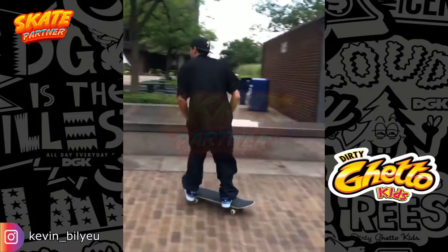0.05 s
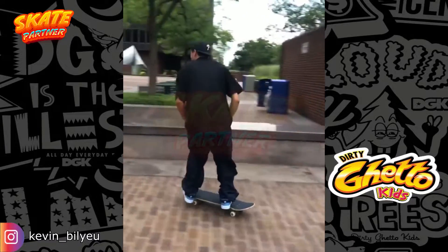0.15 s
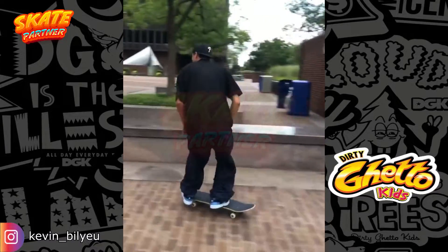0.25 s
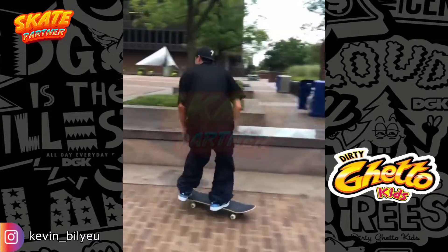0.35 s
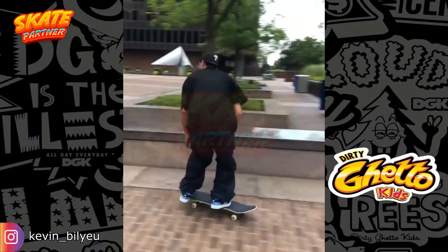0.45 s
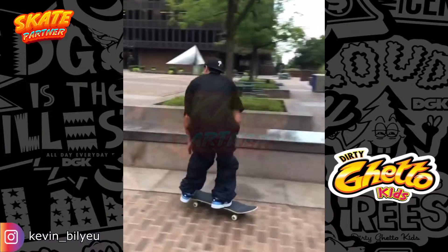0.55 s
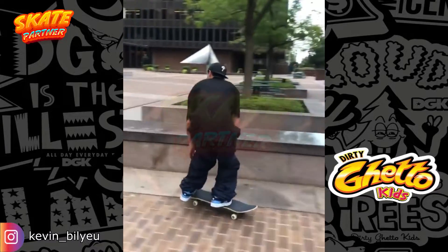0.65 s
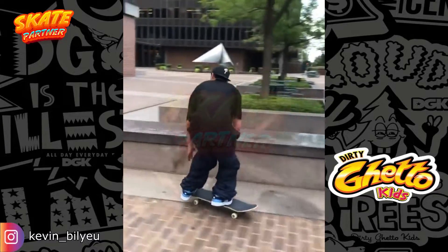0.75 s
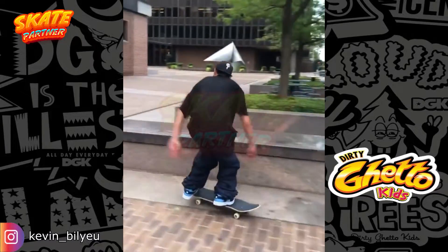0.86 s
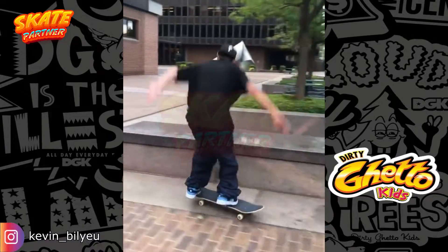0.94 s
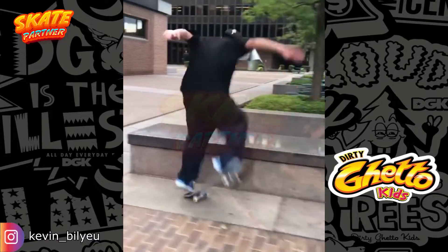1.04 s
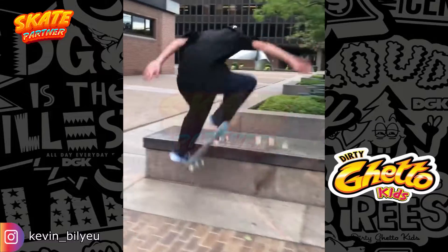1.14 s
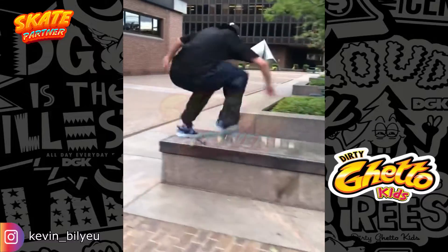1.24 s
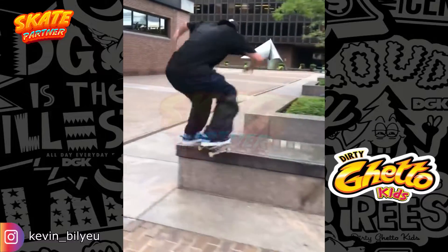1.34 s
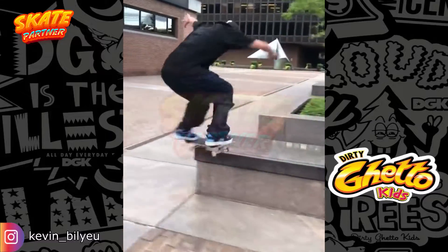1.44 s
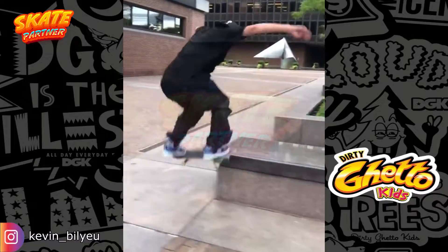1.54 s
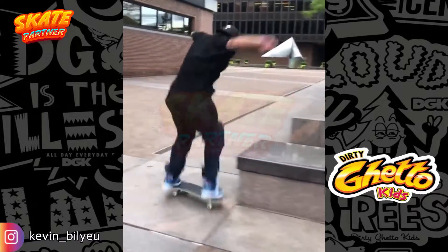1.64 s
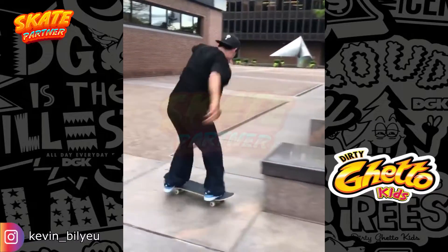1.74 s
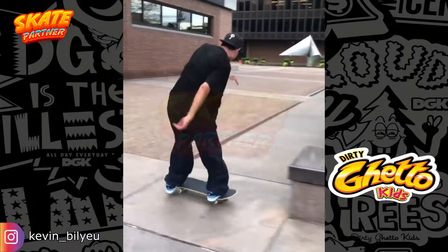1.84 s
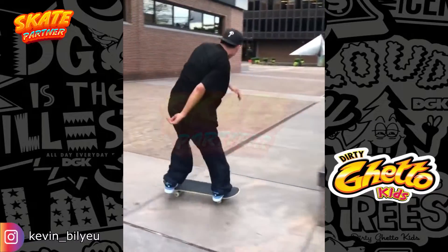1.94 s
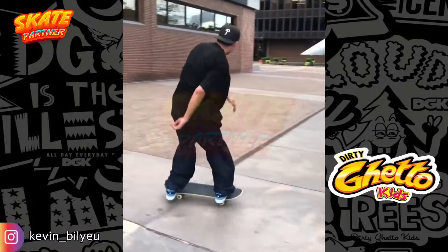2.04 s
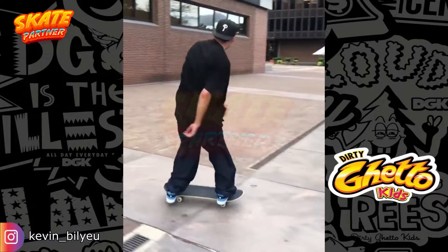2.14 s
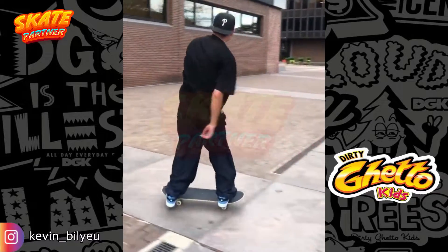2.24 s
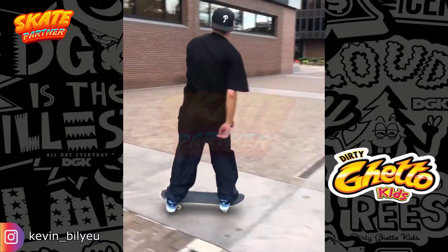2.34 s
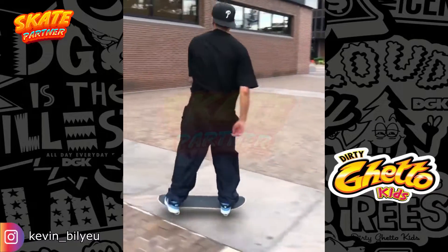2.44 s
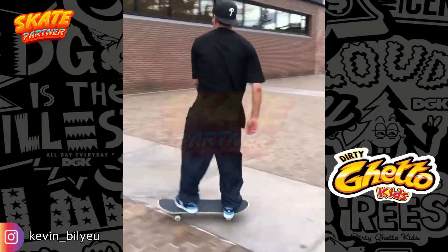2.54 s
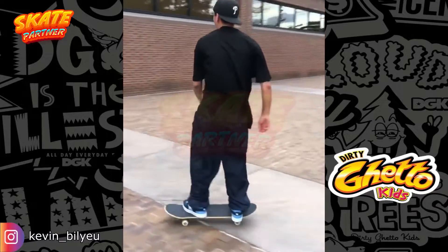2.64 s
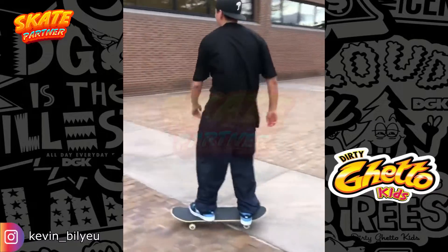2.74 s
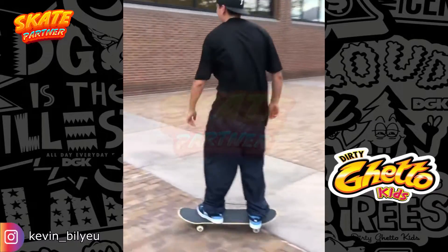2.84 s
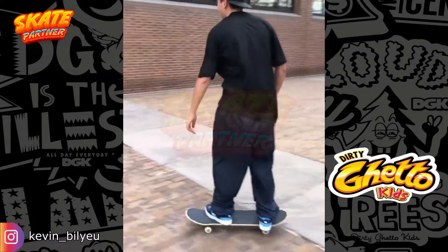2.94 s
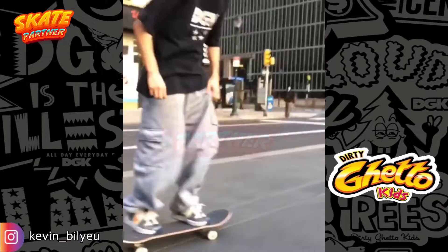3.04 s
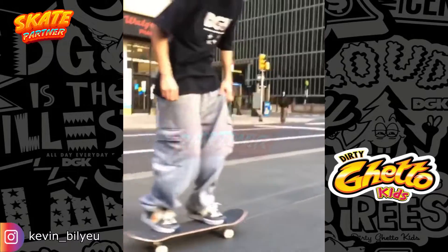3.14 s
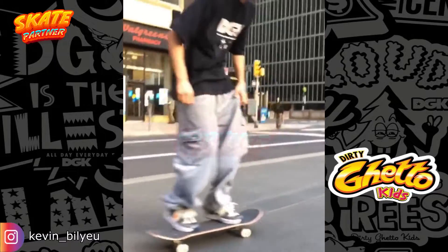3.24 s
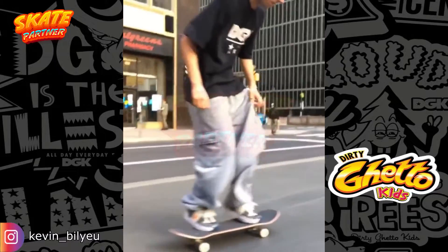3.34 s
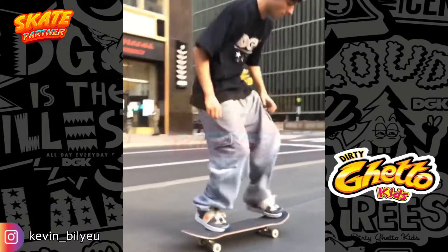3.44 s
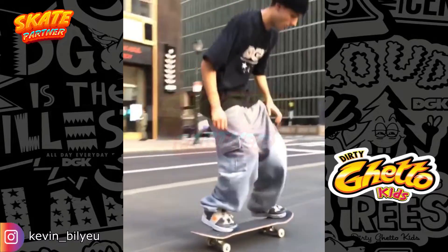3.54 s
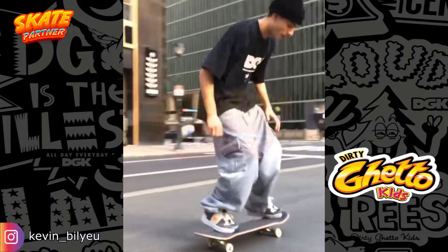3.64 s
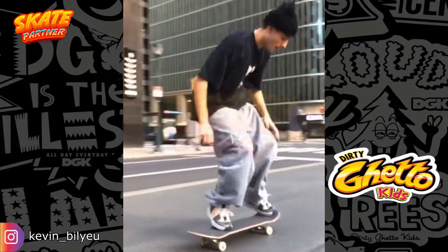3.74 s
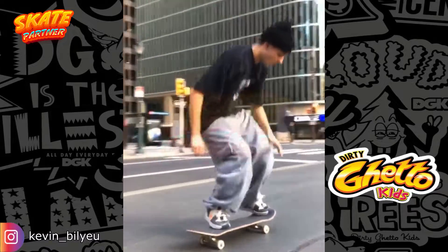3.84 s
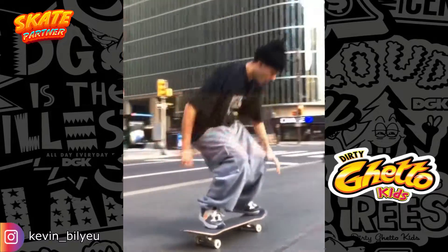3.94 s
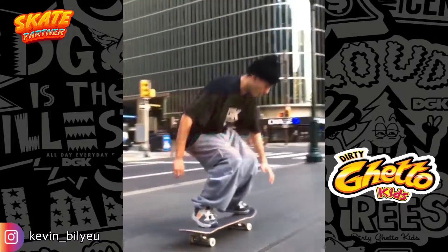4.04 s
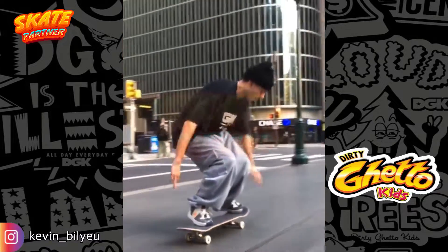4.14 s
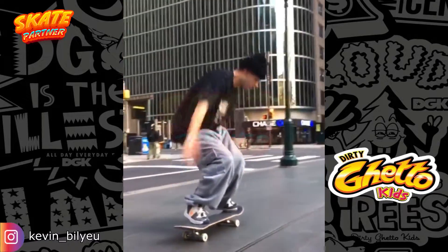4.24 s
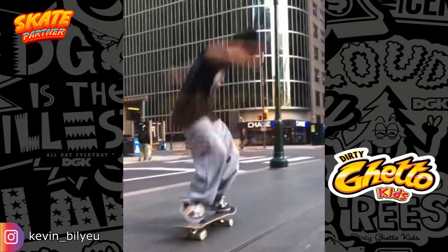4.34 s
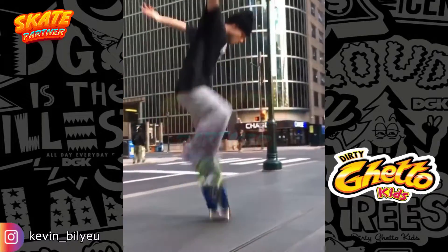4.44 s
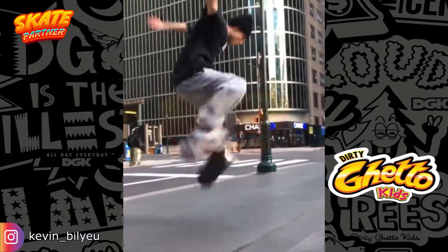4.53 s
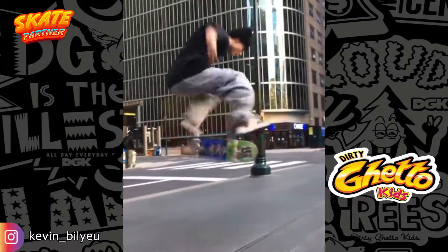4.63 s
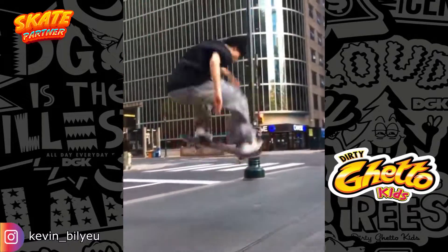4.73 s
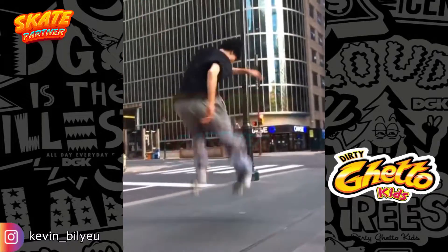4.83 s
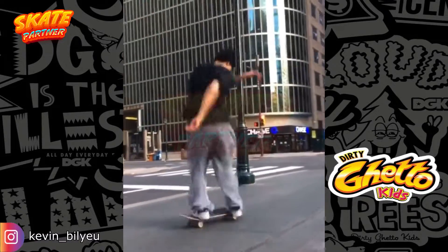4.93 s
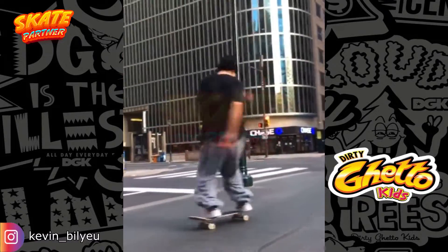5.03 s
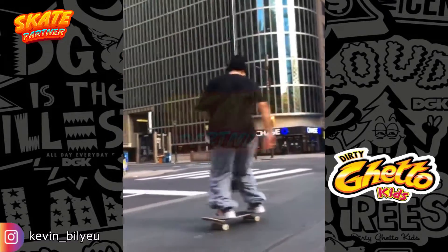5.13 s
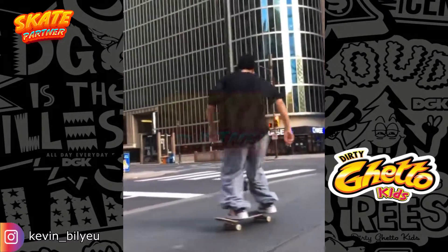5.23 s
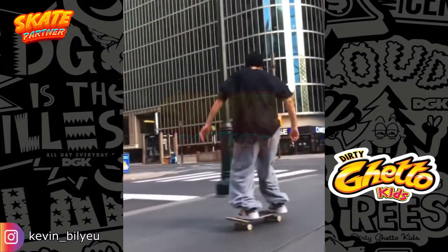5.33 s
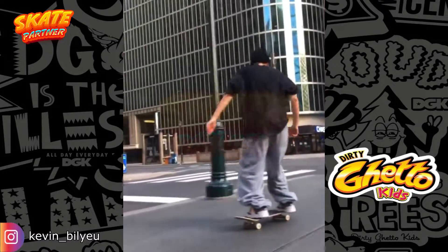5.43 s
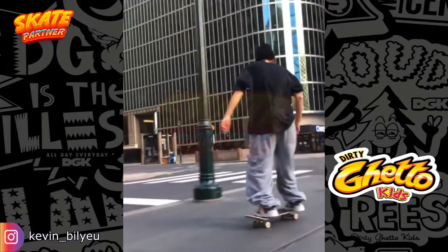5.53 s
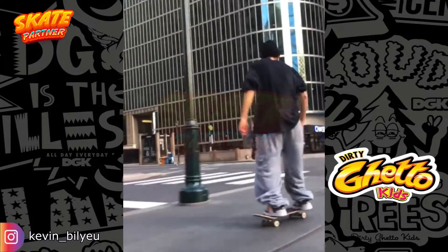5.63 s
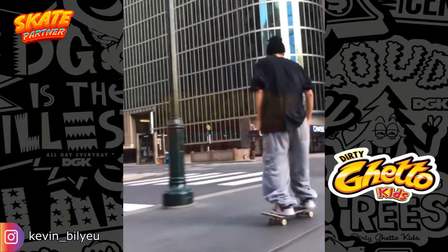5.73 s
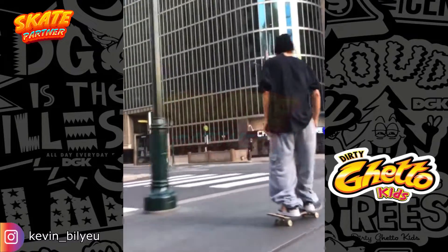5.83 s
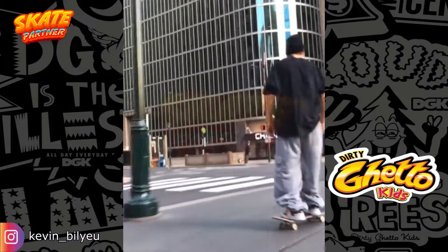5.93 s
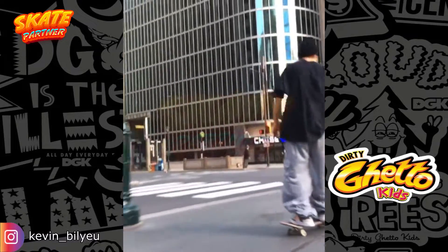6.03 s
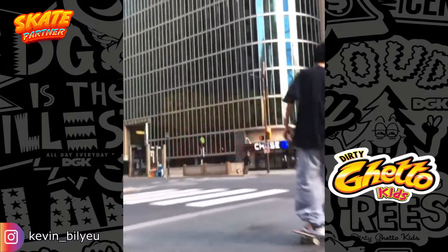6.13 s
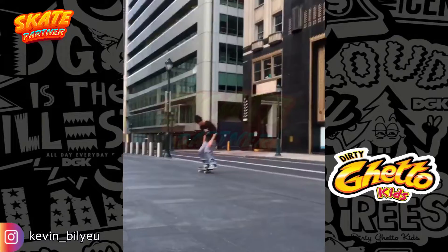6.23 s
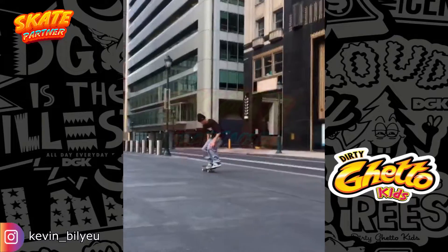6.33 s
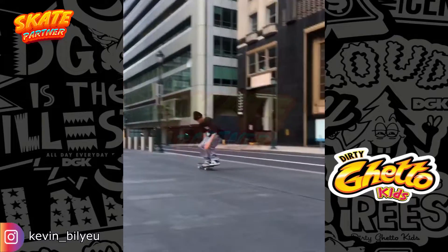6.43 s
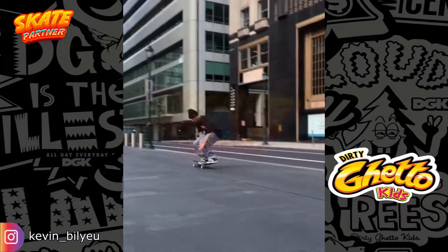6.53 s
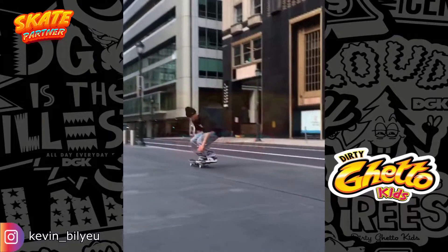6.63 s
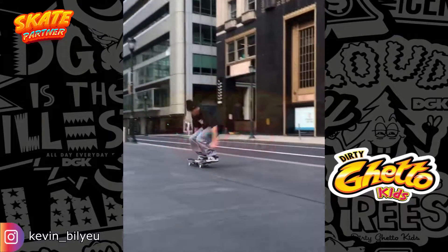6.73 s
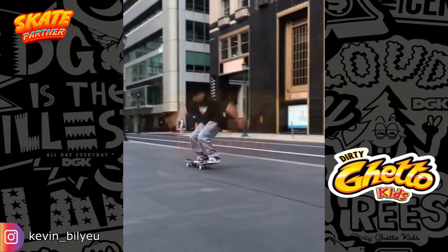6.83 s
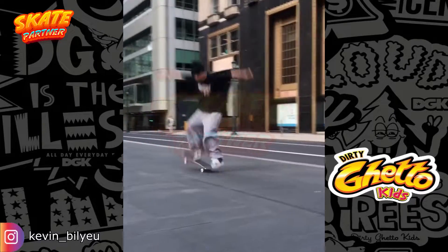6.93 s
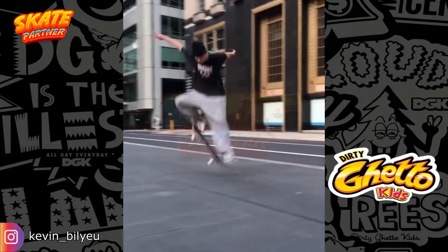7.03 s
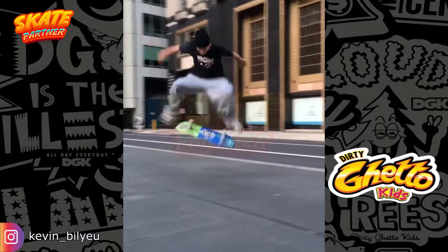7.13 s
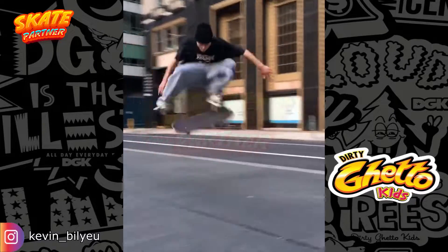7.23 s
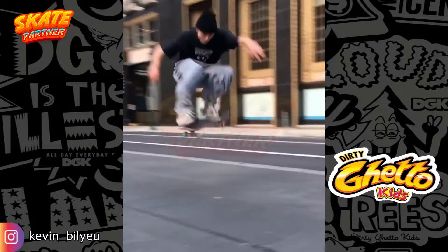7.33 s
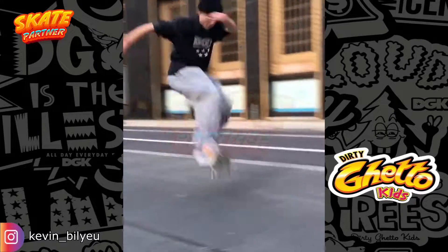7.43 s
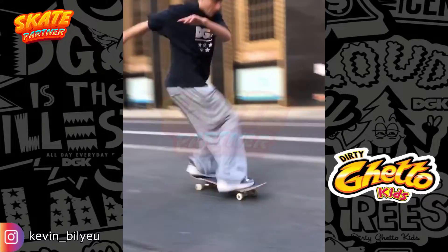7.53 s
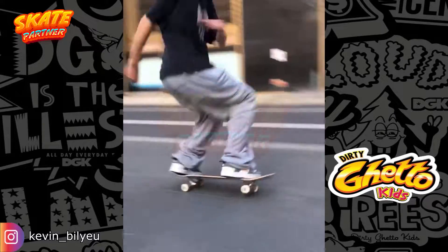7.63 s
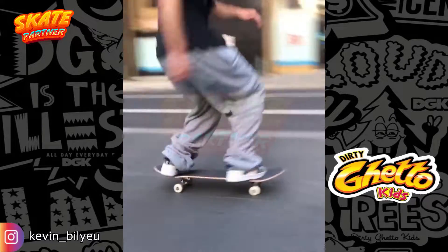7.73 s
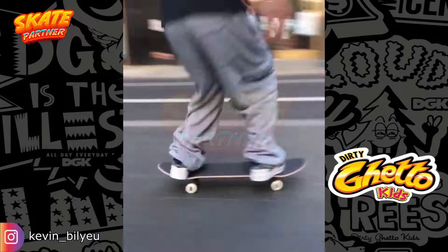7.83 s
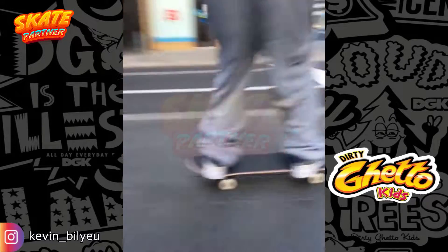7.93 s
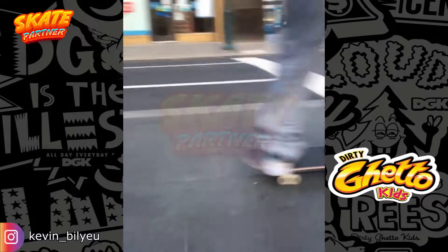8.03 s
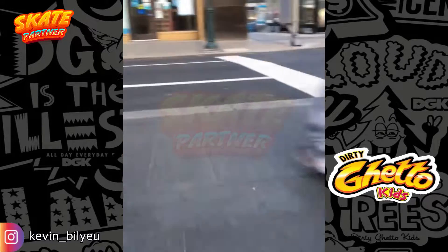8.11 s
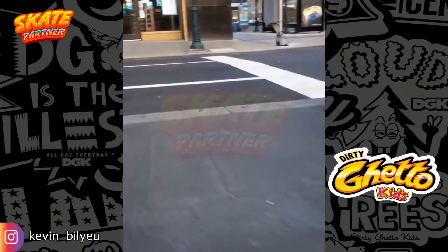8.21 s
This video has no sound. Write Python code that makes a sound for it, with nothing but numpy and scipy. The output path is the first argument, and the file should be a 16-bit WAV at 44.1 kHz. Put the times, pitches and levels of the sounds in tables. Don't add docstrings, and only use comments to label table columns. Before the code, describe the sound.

From 0 s a skateboard rolls over brick, a low woody rumble with fast irregular knocks and little wind. At 1.1 s the tail pops sharply; the wheels go light, then the board knocks onto a stone ledge at 1.3 s, scrapes briefly and clatters down at about 1.7 s. It rolls away, softer, with dull knocks over seams until 3 s. A tiny gap of silence, then a much louder, closer ride on slabs: steady roar, bright hiss and grit, with paired hard clacks under both axles. A cracking pop at 4.3 s, a brief lift, a sharp landing at 4.8 s; clacks continue while wind gusts thump, strongest after 5.3 s. At 6.25 s the place changes: quieter rolling approaches over seams, pops at 7.04 s, lands with a deep woody slap at 7.55 s, then rumbles and rattles close past until 8.27 s. Faint wall echoes follow the blows.

```python
import sys
import numpy as np
from scipy import signal
from scipy.io import wavfile
from scipy.ndimage import uniform_filter1d

SR = 44100
rng = np.random.default_rng(int(sys.argv[2]) if len(sys.argv) > 2 else 0)


def elevation(decibels):
    levels = np.asarray(decibels, float)
    return 10 ** (levels / 20)


def master(y):
    cut = np.clip(np.atleast_2d(y).T, -1, 1)
    pcm = np.round(cut * 32767)
    wavfile.write(sys.argv[1], SR, pcm.astype(np.int16))


N = 364694
TOP_OF_SOUND_HZ = 16050

# start in seconds, end in seconds.
SPOTS = [
    (0, 2.985),
    (3.05, 6.248),
    (6.248, 8.27),
]
# pebbles and edges per second, their height in dB, rattle top in Hz,
# deck thud in dB, knock top in Hz.
GROUND = [
    (47, 4, 8400, 3.5, 2160),
    (30.6, 0, 22000, -7.5, 1930),
    (30.8, -3, 12300, -2, 3300),
]
# mode in Hz, level in dB, t60 in seconds.
DECK_MODES = [(196.7, 0, 0.05), (326, -7, 0.036), (483, -1, 0.023), (654.5, 4, 0.021), (860, -22, 0.21),
              (820, 4, 0.0099), (1144, 3.5, 0.016), (1260, 6, 0.009), (1453, -2, 0.022), (1634, -1, 0.0093),
              (1940, -16, 0.018)]
# start in seconds, level in dB, pitch in Hz, crack in dB,
# contact dies in ms.
TRICKS = [(1.0855, -3.5, 920, -4, 3.3), (1.308, -9.5, 900, -17, 7.2), (1.322, 3, 770, -12.5, 2.8),
          (1.6734, 2, 1070, -18, 3.1), (1.679, 1, 960, -19, 2.6), (1.692, 0.5, 560, -17, 7.9),
          (1.704, -3, 890, -15, 4), (4.328, -1.5, 1310, -2, 4.3), (4.801, -2, 1200, 0, 2.8),
          (4.806, 0, 700, -4, 7.2), (4.818, -8, 956, -4, 4.8), (7.026, -10, 237, -11, 6.8),
          (7.039, -6.5, 1120, -1, 4.8), (7.048, -11.5, 900, -4, 11), (7.525, 0, 283, 1, 6.2),
          (7.533, 2, 346, -14, 6), (7.542, -12, 202, 3, 4.6), (7.565, 0, 690, -8.5, 7.6),
          (7.579, -11, 500, -4, 4.3)]


def rms_one(x):
    return x / np.sqrt(np.mean(x ** 2) + 1e-20)


def peak_one(x):
    return x / np.max(np.abs(x), axis=1, keepdims=True)


def lowpass(x, order, hz):
    return signal.sosfilt(signal.butter(order, hz, fs=SR, output="sos"), x)


def bandpass(x, edges_hz):
    return signal.sosfilt(signal.butter(2, edges_hz, "band", fs=SR, output="sos"), x)


def at_hz(points, hz):
    spectrum_hz, db = np.transpose(points)
    return np.interp(np.log(hz), np.log(spectrum_hz), db)


def drift(rate, size):
    knots = rng.standard_normal(int(size / SR * 400) + 3)
    return np.interp(np.arange(size) * rate / SR, np.arange(len(knots)), knots)


def ring(force, hz, t60):
    r, w = elevation(-60 / (t60 * SR)), 2 * np.pi * hz / SR
    return signal.lfilter([0, np.sin(w)], [1, -2 * r * np.cos(w), r * r], force + 1e-18)


def coloured(spectrum, size, shake_db, patchy_db, top_hz=None, hole_db=0):
    hole_odds, holes_per_s = -1.25, 25
    settle = 4000
    low_hz, top_hz = spectrum[0][0], top_hz or spectrum[-1][0]
    edges = np.geomspace(low_hz, top_hz, int(6 * np.log2(top_hz / low_hz)) + 2)
    shaken = np.pad(elevation(shake_db), (settle, 0), "edge")
    white = rng.standard_normal((2, size + settle)) * shaken
    out = 0
    for k, (low, high) in enumerate(zip(edges, edges[1:])):
        band = bandpass(white[k % 2], [low, high])[settle:]
        flicker_db = patchy_db * drift(14, size)
        hole = np.clip(4.9 * (hole_odds - drift(holes_per_s, size)), 0, 1)
        out = out + band * elevation(at_hz(spectrum, np.sqrt(low * high)) + flicker_db + hole_db * hole)
    return rms_one(out)


def pebbles(per_s, height_db, size):
    chance = rng.random((2, size))
    jolts = (chance[0] < per_s / SR) * np.minimum(-np.log(chance[1] + 1e-9), 1.6)
    return height_db * signal.lfilter([1], [1, -np.exp(-1 / (0.0075 * SR))], jolts)


def grains(per_s, db, spread_db, longer, size):
    chance = rng.random((2, size))
    sizes = elevation(-spread_db * np.maximum(np.log(chance[1] + 1e-9), -3))
    knocks = (chance[0] < per_s / SR) * sizes
    deck = 0
    for hz, mode_db, t60 in DECK_MODES[1:]:
        deck = deck + ring(knocks * rng.standard_normal(size), hz, t60 * longer) * elevation(mode_db)
    return elevation(db) * rms_one(lowpass(deck, 2, 1800))


def rolling(spot):
    # frequency in Hz, level in dB per Hz.
    wind_colours = [
        [(15, -65), (25, -17), (70, 1), (86, -2), (140, -17), (180, -19), (310, -120)],
        [(15, -18), (25, -2.5), (54, 6), (140, -8.5), (180, -29), (310, -120)],
        [(15, -44), (25, -14), (43, 5), (86, 7.5), (140, 7), (180, -37), (310, -120)],
    ]
    boom_colours = [
        [(59, -53), (100, -12), (167, 0), (194, -6.5), (242, -3.5), (420, -8.5), (550, -71), (920, -120)],
        [(59, -39), (100, 2.5), (189, 1), (311, -1.5), (338, -2), (420, -6.5), (550, -48), (920, -120)],
        [(59, -53), (100, -12), (204, -2.5), (269, -4.5), (328, -3), (420, -3.5), (550, -45), (920, -120)],
    ]
    roar_colours = [
        [(220, -17), (380, 4), (488, 0.5), (662, 3.5), (943, -7), (1140, -14.5), (1550, -8), (2300, -25),
         (2600, -48), (3380, -87), (5720, -120)],
        [(220, -34), (380, -6.5), (492, 2.5), (573, 0), (689, -0.5), (810, -4.5), (982, -11), (1220, -1.5),
         (1480, -8.5), (1870, -57), (2600, -26), (3380, -117), (5720, -120)],
        [(220, -20), (380, -4), (555, -0.5), (646, 1.5), (990, -9.5), (1260, -9.5), (1810, -17.5), (2600, -33),
         (3380, -62), (5720, -120)],
    ]
    hiss_colours = [
        [(1350, -47), (2300, 1.5), (2860, -21), (3190, -2.5), (4230, -10.5), (5600, -12.5), (7830, -21),
         (9700, -24), (10300, -37), (11400, -26), (14600, -35), (15600, -43)],
        [(1350, -44), (2300, 1), (2510, -2.5), (2870, -7.5), (4290, -7), (5890, -13), (10300, -9.5),
         (11000, -6.5), (12000, -2.5), (13300, -8.5)],
        [(1350, -8), (2300, -3), (2700, -7), (4290, -8.5), (4940, -15.5), (6720, -10.5), (8010, -16.5),
         (8950, -9.5), (10400, -15.5), (13300, -10.5)],
    ]
    # time in seconds, level in dB.
    rides = [
        [(0.0, -24), (1.12, -28.5), (1.57, -27.5), (1.69, -27.5), (2.06, -27.5), (2.7, -35), (2.97, -35.5)],
        [(3.05, -20), (3.27, -16), (3.4, -17), (4.44, -19.5), (6.24, -20.5)],
        [(6.28, -28.5), (6.484, -28.5), (7.282, -26.5), (7.752, -27), (8.012, -23), (8.27, -22.5)],
    ]
    # time in seconds, level in dB.
    gusts = [
        [(0, -40), (0.19, -46.5), (2.75, -44.5), (2.94, -41)],
        [(3.1, -27.5), (3.9, -24), (4.73, -17.5), (5.1, -23.5), (5.31, -18.5), (5.39, -10), (5.5, -24.5),
         (5.71, -12), (6.05, -22), (6.22, -12.5)],
        [(6.3, -40), (6.694, -30.5), (7.992, -35), (8.13, -18.5), (8.27, -21.5)],
    ]
    # wind gain in dB, roar gain in dB, mean boom in dB,
    # boom share of the ride's swing, mean hiss in dB, hiss share.
    follow = [
        (0.1, -2.5, -30.5, 1.02, -52, 0.59),
        (0.1, -1, -23.5, 0.15, -36, 0.85),
        (0.1, -2, -25, .2, -38, 1.3),
    ]
    # start in seconds, end in seconds, hiss
    # change in dB, roar change in dB.
    flights = [
        (1.127, 1.297, 0, -2),
        (4.36, 4.79, -0.9, -0.7),
        (7.172, 7.326, -3, 1),
    ]
    # grains per second, level in dB, spread in dB, ring longer by (factor).
    grit_knocks = [
        (162, -39.5, 4.5, 2.1),
        (218.7, -24.5, 3, 2.7),
        (153, -38, -0.5, 2.4),
    ]

    start, end = (min(round(s * SR), N) for s in SPOTS[spot])
    size, t = end - start, np.arange(start, end) / SR
    ride_db = np.interp(t, *np.transpose(rides[spot]))
    gust_db = np.interp(t, *np.transpose(gusts[spot]))
    wind_gain_db, roar_gain_db, boom_db, boom_share, hiss_db, hiss_share = follow[spot]
    swing_db = ride_db - ride_db.mean()
    wind_db, roar_db = gust_db + wind_gain_db, ride_db + roar_gain_db
    boom_db, hiss_db = boom_db + boom_share * swing_db, hiss_db + hiss_share * swing_db
    lift_s = 0.02
    for lift, land, less_hiss_db, less_roar_db in flights:
        airborne = np.interp(t, [lift - lift_s, lift, land, land + lift_s], [0, 1, 1, 0])
        hiss_db, roar_db = hiss_db + less_hiss_db * airborne, roar_db + less_roar_db * airborne

    bumps, grit = drift(25.21, size), drift(120, size)
    jolts = pebbles(*GROUND[spot][:2], size)
    wind = coloured(wind_colours[spot], size, 1.6 * drift(10.26, size), patchy_db=0.5)
    boom = coloured(boom_colours[spot], size, 3.4 * bumps + jolts, patchy_db=1.5)
    roar = coloured(roar_colours[spot], size, 1.2 * bumps + 1.84 * grit + jolts, patchy_db=1.0)
    hiss = coloured(hiss_colours[spot], size, 0.7 * bumps + 2.1 * grit + 0.3 * jolts, patchy_db=0.4,
                    top_hz=TOP_OF_SOUND_HZ, hole_db=-22)
    ride = elevation(wind_db) * wind + elevation(boom_db) * boom + elevation(roar_db) * roar + elevation(hiss_db) * hiss
    ride += elevation(swing_db) * grains(*grit_knocks[spot], size)

    from_edge = np.minimum(np.arange(size), np.arange(size)[::-1])
    out = np.zeros(N)
    out[start:end] = ride * np.clip(from_edge / 60, 0, 1)
    return out


def slides():
    # start in seconds, rise in seconds, fall in seconds, centre in Hz, width in octaves, level in dB.
    scrapes = [(0.525, 0.04, 0.1, 170, 0.35, -19), (1.331, 0.008, 0.06, 2450, 0.4, -37),
               (1.708, 0.008, 0.06, 3500, 1.3, -45), (4.333, 0.006, 0.035, 3200, 0.9, -30),
               (4.801, 0.004, 0.03, 5000, 2.6, -25), (7.035, 0.012, 0.13, 2400, 1.0, -34),
               (7.421, .03, 0.15, 2420, .05, -40), (7.661, 0.27, 0.6, 9200, .3, -39.5),
               (7.851, 0.12, 0.091, 737, 0.15, -21.5), (1.401, 0.077, 0.053, 940, 0.59, -27),
               (0.001, .008, .07, 580, .6, -24), (6.271, .06, .2, 390, .6, -29),
               (7.201, .05, .06, 200, .4, -22), (7.13, .08, .2, 2200, 1.1, -36),
               (3.051, .004, .07, 650, .4, -20), (.678, .004, .02, 4000, 1.5, -44),
               (.785, .03, .11, 220, .7, -24), (.955, .025, .05, 150, .4, -25),
               (7.11, .02, .06, 200, .5, -23), (7.68, .004, .025, 9000, 1.2, -36),
               (7.6, .03, .06, 2600, 1.1, -35), (1.324, .003, .07, 6500, 1.2, -49),
               (1.086, .002, .022, 4000, 1.3, -39), (7.23, .025, .04, 220, .6, -21),
               (7.038, .002, .012, 5000, 1.2, -24)]
    out, t = np.zeros(N + SR), np.arange(SR) / SR
    for start, rise, fall, hz, octaves, db in scrapes:
        edges = hz * 2. ** (np.array([-.5, .5]) * octaves)
        grit = rng.standard_normal(SR) * elevation(1.5 * drift(150, SR))
        swell = np.interp(t, [0, rise, rise + fall], [0, 1, 0]) ** 1.1
        out[round(start * SR):][:SR] += elevation(db) * rms_one(bandpass(grit, edges)) * swell
    return out[:N]


def contacts(spot):
    # start in seconds, level in dB, pitch in Hz.
    bricks = [(0.01, -17, 611), (0.04, -34, 503), (0.071, -18, 635), (0.119, -10.5, 552), (0.148, -15, 444),
              (0.16, -15, 444), (0.178, -11.5, 598), (0.243, -12.5, 506), (0.264, -12.5, 457),
              (0.327, -21, 538), (0.346, -18, 1390), (0.357, -14.5, 614), (0.379, -11.5, 401),
              (0.413, -19, 716), (0.469, -13, 624), (0.51, -15, 460), (0.567, -12.5, 460),
              (0.612, -29, 689), (0.643, -16, 611), (0.661, -12.5, 627), (0.681, -6.5, 420),
              (0.693, -11, 487), (0.73, -14, 681), (0.822, -18.5, 563), (0.892, -33, 557),
              (0.931, -35, 480), (0.979, -20, 406)]
    # start in seconds, level in dB, pitch in Hz, crack in dB.
    ledge = [(1.142, -27, 730, -5), (1.198, -24, 1290, -25), (1.218, -16, 1000, -25),
             (1.286, -18.5, 1400, -25), (1.376, -26, 900, -8), (1.406, -13, 681, -22),
             (1.488, -15, 891, -22), (1.499, -26, 900, 0), (1.518, -22.5, 479, -5), (1.542, -5.5, 415, -33),
             (1.565, -12, 401, -11), (1.775, -15, 684, -15), (1.922, -10, 493, -21),
             (1.939, -17.5, 543, -8), (1.996, -12.5, 443, -16), (2.054, -9, 560, -32),
             (2.152, -13, 460, -19), (2.161, -10.5, 593, -32), (2.21, -4, 517, -19.5),
             (2.218, -6.5, 460, -30), (2.312, -8, 622, -39), (2.251, -15, 500, -25),
             (2.299, -15.5, 450, -30), (2.422, -13, 650, -25), (2.433, -8.5, 648, -28),
             (2.484, -11, 1105, -10.5), (2.49, -3.5, 653, -27), (2.499, -20, 700, -8),
             (2.609, -21.5, 554, -10), (2.839, -14, 425, -24), (2.939, -21.5, 729, -11)]
    # start in seconds, level in dB, pitch in Hz, crack in dB, rattle in dB.
    joints = [(3.212, 2.5, 604, -36, -22.5), (3.294, 1, 1240, -34, -22), (3.33, -0.5, 690, -30, -27),
              (3.41, 2.5, 627, -23, -25.5), (3.639, -1, 1260, -25.5, -20), (3.724, -0.5, 1160, -27.5, -23),
              (3.763, 0.5, 684, -30, -34), (3.848, -0.5, 641, -25, -27), (4.068, 0, 1200, -25, -22),
              (4.155, 1, 510, -19.5, -22.5), (4.196, -1, 675, -24, -24), (4.282, 0.5, 643, -25.5, -30),
              (4.514, 0, 483, -23, -23), (4.604, -0.5, 1310, -23, -22), (4.642, 1, 820, -28, -28),
              (4.732, 0, 680, -29, -24), (4.961, -0.5, 493.6, -28, -31), (5.052, -3.5, 815, -21, -21),
              (5.093, 0.5, 650, -20, -29), (5.185, -5, 634, -22, -26), (5.421, -1, 500, -31, -32),
              (5.518, -0.5, 1100, -24, -21.5), (5.559, -2, 685, -18, -23), (5.653, -1.5, 683, -21, -22),
              (5.893, 0, 490, -25, -22.5), (5.99, 2, 1150, -29, -24.5), (6.033, -2, 692, -28, -29),
              (6.129, 0.5, 820, -33, -28)]
    # start in seconds, level in dB, pitch in Hz.
    stones = [
        (3.178, -4.5, 1190),
        (3.256, -22, 597),
        (3.568, -5.5, 482),
        (3.7, -18, 1200),
        (3.801, -8, 660),
        (3.88, -20, 900),
        (3.978, -15, 900),
        (4.051, -9, 900),
        (5.804, -25, 517),
    ]
    # start in seconds, level in dB, pitch in Hz, crack in dB, rattle in dB.
    seams = [(6.471, -18, 370, -10, -9), (6.484, -3, 500, -18, -25), (6.537, -20, 406, -4, -4),
             (6.602, -11, 455, -18, -21), (6.637, -14, 450, -12, -8.5), (6.698, -10.5, 338, -20, -13.5),
             (6.712, -4, 326, -18, -24), (6.798, -13, 229, -8.5, -4), (6.866, -11, 484, -16, -9.5),
             (6.997, -11, 301, -28, -34), (7.103, -12, 1200, -7, -20), (7.212, -12, 253, -31, -38),
             (7.34, -14, 328, -5.5, -9), (7.736, -15, 204, -20, -7), (7.774, -4.5, 205, -34, -14),
             (7.886, -6.5, 205, -8, -8), (7.93, -17, 786, -3, -2), (7.987, -4, 730, -10.5, -8.5),
             (8.096, -2, 516, -13.5, -5), (8.186, -3, 203, -17, -18)]
    # rattle under a rolling wheel in dB, its share of the crack,
    # contact dies in ms, rattle in a trick in dB, its share of the crack.
    hardware = [
        (-22.5, 0.83, 4.8, -16.5, 0.62),
        (-10, 0.17, 2.8, -7, 0.24),
        (0, 0, 5.8, -5.5, 0.25),
    ]

    rattle_db, share, dies_ms, trick_db, trick_share = hardware[spot]
    every = []
    for s, db, hz, crack_db in ledge + [(*stone, -19) for stone in stones]:
        grind_db = 13.5 * (1.33 < s < 1.67)
        every.append((s, db, hz, crack_db, rattle_db + share * crack_db + grind_db, dies_ms))
    brick_crack_db = -31
    for s, db, hz in bricks:
        every.append((s, db + 2.5, hz, brick_crack_db, rattle_db + share * brick_crack_db, 2.66))
    for s, db, hz, crack_db, shake_db in joints:
        every.append((s, db + 2.5, hz, crack_db + 7, shake_db + 10, 4.53))
    every += [(*row, dies_ms) for row in seams]
    for s, db, hz, crack_db, trick_dies_ms in TRICKS:
        every.append((s, db, hz, crack_db, trick_db + trick_share * crack_db, trick_dies_ms))
    start, end = SPOTS[spot]
    return [row for row in every if start < row[0] < end]


def blows(table, low_hz, top_hz, thud_db, soft_hz):
    # mode in Hz, level in dB, t60 in seconds.
    truck_modes = [
        (2147, 8.5, 0.0052),
        (2370, -3, 0.019),
        (3300, -1.5, 0.0072),
        (3900, 1, 0.004),
        (4300, -2.5, 0.0096),
        (5700, -6, 0.0016),
    ]
    gain_db, uneven_db = -1.5, 3.0
    rows, t = np.array(table), np.arange(2000) / SR
    pitch_hz, crack_db, rattle_db = rows[:, 2:3], rows[:, 3:4], rows[:, 4:5]
    lasts = np.clip(rows[:, 5:], .5, 15) / 1000
    bounces = elevation(2.1 * np.repeat(rng.standard_normal((len(rows), len(t) // 80)), 80, axis=1))
    fade = np.exp(-t / lasts) * (1 - np.exp(-t / (0.11 * lasts))) * bounces
    sharp = np.exp(-1.3 * t / lasts) * (1 - np.exp(-t / 0.00032)) * bounces

    def struck(modes, slope_db, force, soft_hz):
        total = 0
        for hz, mode_db, t60 in modes:
            chance = rng.standard_normal((len(rows), len(t) + 1))
            near_db = -slope_db * np.abs(np.log2(hz / pitch_hz))
            if hz < 250:
                near_db = thud_db
            mode = peak_one(ring(chance[:, 1:] * force, hz, t60))
            total = total + mode * elevation(mode_db + near_db + uneven_db * chance[:, :1])
        return peak_one(lowpass(total, 4, soft_hz))

    rattle = peak_one(bandpass(rng.standard_normal(fade.shape) * sharp, [low_hz, top_hz]))
    knock = struck(DECK_MODES, 9.0, fade, soft_hz)
    crack = struck(truck_modes, 0, sharp, 6840)
    each = knock + elevation(crack_db) * crack + elevation(rattle_db) * rattle
    out = np.zeros(N + len(t))
    for s, blow in zip(rows[:, 0], each * elevation(rows[:, 1:2] + gain_db)):
        out[round(s * SR):][:len(t)] += blow
    return signal.sosfilt(signal.butter(2, 130, "high", fs=SR, output="sos"), out[:N])


def street(x):
    # delay in seconds, level in dB.
    echoes = [
        (0.021, -22),
        (.037, -18),
        (.062, -21.5),
    ]
    dull = lowpass(x, 1, 2500)
    return x + sum(elevation(db) * np.pad(dull, (round(s * SR), 0))[:N] for s, db in echoes)


def pings():
    # start in seconds, pitch in Hz, level in dB, t60 in seconds.
    ringing_parts = [(1.083, 1350, -22, 0.04), (1.085, 2000, -13, 0.032), (1.086, 4300, -25, 0.025),
                     (1.086, 2700, -26, 0.049), (1.086, 4600, -21, 0.02), (1.268, 3000, -33, .03),
                     (1.323, 5100, -17, 0.019), (1.323, 3150, -29, .04), (7.339, 3100, -19, 0.02),
                     (1.323, 1950, -14, 0.045), (1.375, 5400, -32, 0.018), (1.674, 5400, -23, 0.036),
                     (1.679, 2260, -13, 0.041), (1.679, 3600, -26, .02), (1.694, 3400, -21, .03),
                     (1.696, 2170, -22, .03), (4.325, 2500, -4, .02), (4.328, 3200, -9, 0.023),
                     (4.331, 1220, -3, 0.029), (4.338, 2450, -20, .05), (4.339, 3450, -25, .04),
                     (4.339, 4660, -28, .03), (4.802, 2200, -7, 0.034), (4.802, 4000, -17, 0.05),
                     (4.808, 3400, -10, 0.04), (4.82, 3700, -22, .04), (4.81, 2140, -12, 0.044),
                     (4.604, 2300, -16.5, 0.027), (4.515, 3300, -22, 0.025), (3.213, 2600, -16, .025),
                     (5.517, 2200, -8, 0.022), (5.559, 3900, -17, 0.026), (7.04, 3300, -19, 0.021),
                     (7.041, 4000, -10, 0.015), (7.041, 5700, -15, .015), (7.104, 3100, -14.5, .025),
                     (4.803, 3100, -19, 0.02), (4.822, 4500, -21, .03), (1.333, 2300, -23, .05),
                     (1.324, 670, -4.5, 0.032), (1.4, 720, -17, 0.028), (2.491, 1700, -20, 0.034),
                     (0.78, 5500, -39, .015), (1.49, 860, -17, .03), (3.214, 3100, -23, .02),
                     (7.56, 1540, -8.5, 0.036), (7.544, 3000, -6, 0.018), (7.568, 1570, -9, 0.037),
                     (7.568, 950, -5, 0.05), (7.988, 750, -21, .04), (1.316, 246, -9.5, .07),
                     (6.484, 1330, -11, .02), (2.488, 600, -11, 0.046)]
    chatter_cycles, clear_share, rise_s = 16, 0.5, 0.00065
    out, t = np.zeros(N + SR), np.arange(SR // 5) / SR
    for s, hz, db, t60 in ringing_parts:
        chatter = ring(rng.standard_normal(2 * len(t)), hz, chatter_cycles / hz)
        rough = rms_one(chatter[len(t):])
        tone = clear_share * np.sin(2 * np.pi * (hz * t + rng.random())) + 0.6 * rough
        out[round(s * SR):][:len(t)] += elevation(db - 60 * t / t60) * (1 - np.exp(-t / rise_s)) * tone
    return out[:N]


def ducking():
    duck_db, from_db, recovers_s = -1.5, -2, 0.028
    t, gain_db = np.arange(N) / SR, 0
    for s, db, *_ in TRICKS:
        depth_db = duck_db * max(2.5 - db / from_db, 0)
        gain_db = gain_db + depth_db * (t > s) * np.exp(-np.abs(t - s) / recovers_s)
    return elevation(gain_db)


def scene():
    rattle_from_hz = [4600, 10200, 5500]
    ride = sum(rolling(spot) for spot in range(3)) * ducking() + slides()
    hits = sum(blows(contacts(spot), rattle_from_hz[spot], *GROUND[spot][2:]) for spot in range(3))
    mix = ride + street(hits + pings())
    mix[round(SPOTS[0][1] * SR):round(SPOTS[1][0] * SR)] = 0
    return mix[None]


def low_pass(x):
    return signal.sosfilt(signal.butter(12, 16110, fs=SR, output="sos"), x)


def record(dry):
    def steep(x, hz):
        return signal.sosfiltfilt(signal.ellip(10, .2, 30, hz, fs=SR, output="sos"), x)

    held = dry / (1 + np.abs(dry / 1.04) ** 8) ** (1 / 8)
    held = steep(held, TOP_OF_SOUND_HZ)
    below = steep(held, 14050)
    t = np.arange(N)
    top_gain = np.where(t < SPOTS[1][0] * SR, 1, elevation(-18 - 3 * drift(25, N)))
    top = (held - below) * top_gain
    nick_odds = np.where(t < SPOTS[2][0] * SR, -1.9, -0.8)
    kept = drift(30, N) > nick_odds
    finished = below + top * uniform_filter1d(kept * 1., size=200)
    return low_pass(finished)


dry = scene()
out = record(dry)
master(out)
```